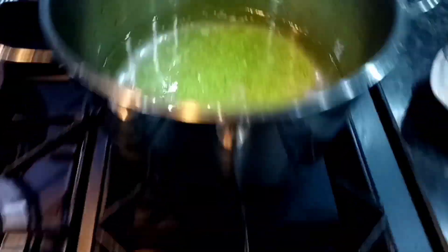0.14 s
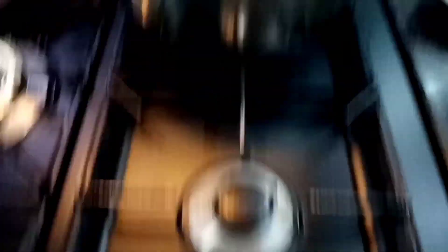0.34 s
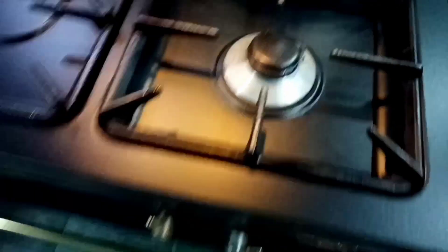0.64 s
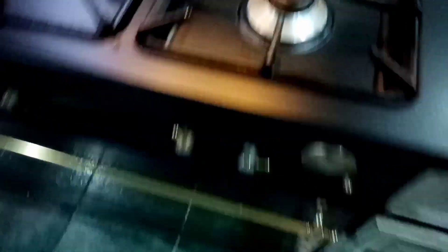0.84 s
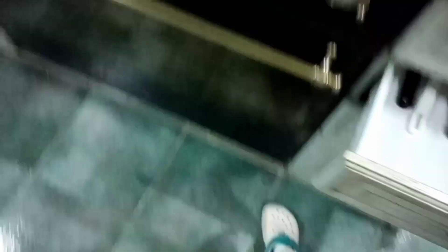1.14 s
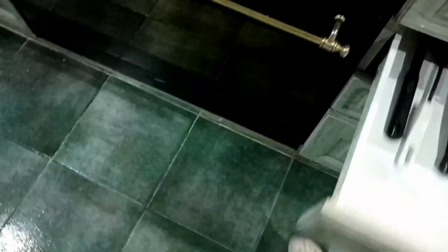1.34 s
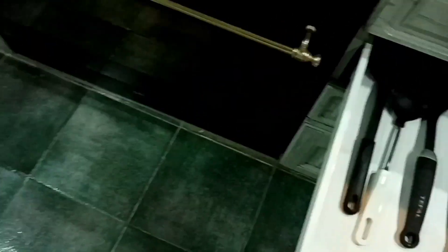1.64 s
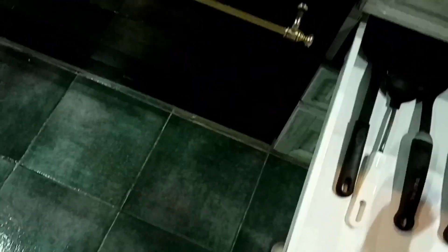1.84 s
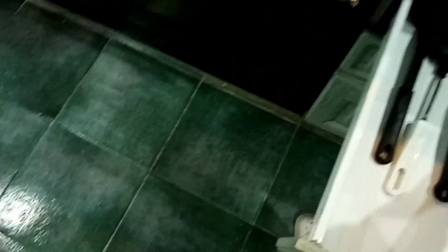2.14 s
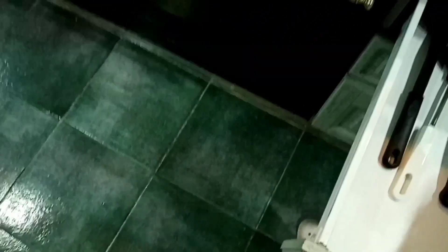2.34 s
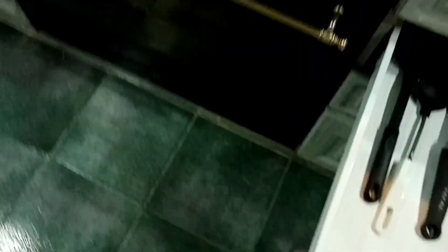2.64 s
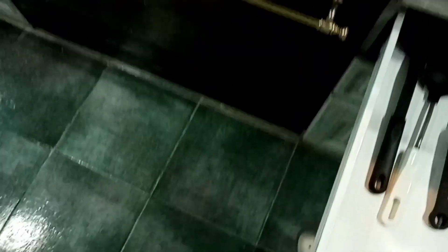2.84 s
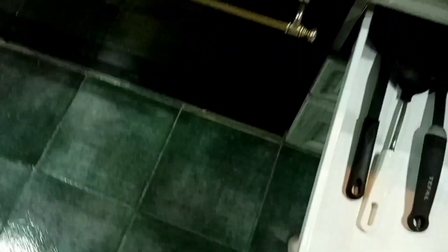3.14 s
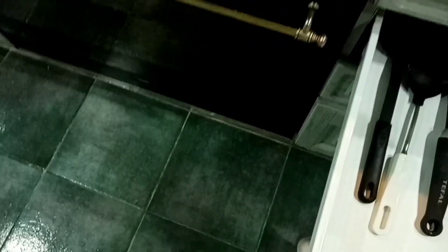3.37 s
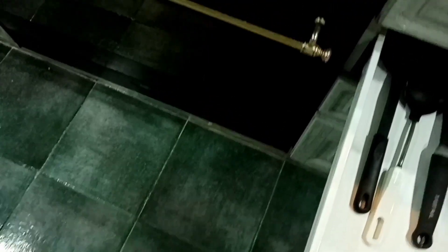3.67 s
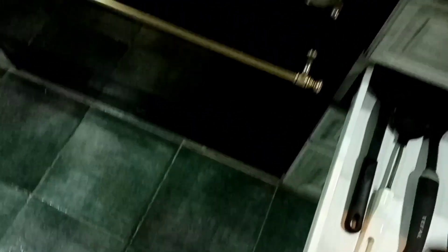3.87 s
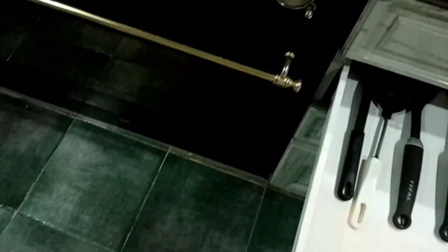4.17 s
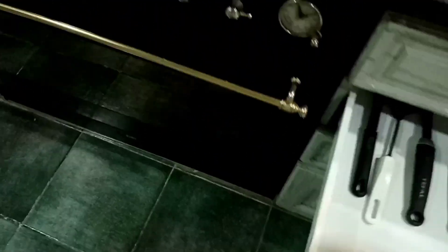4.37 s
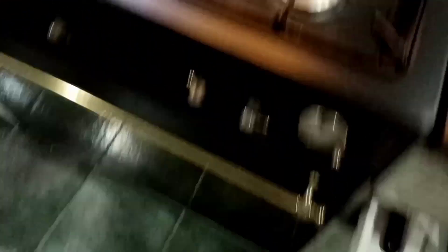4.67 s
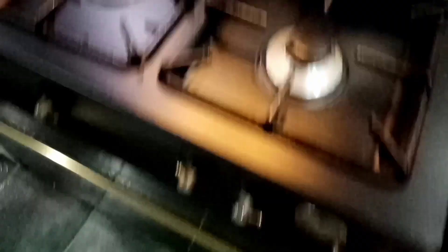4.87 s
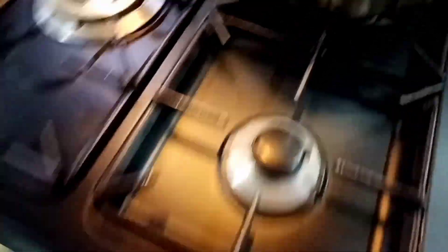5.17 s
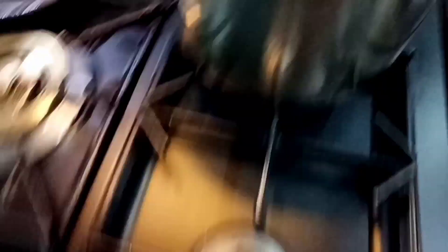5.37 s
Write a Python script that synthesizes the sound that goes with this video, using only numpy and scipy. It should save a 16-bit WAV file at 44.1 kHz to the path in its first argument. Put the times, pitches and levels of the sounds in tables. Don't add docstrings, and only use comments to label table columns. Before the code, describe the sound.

Over faint fridge hum and burner hiss, a drawer of utensils rolls open with rattles, pauses, gets stirred, then rolls shut with a hard clatter.

```python
import sys
import numpy as np
from scipy import signal
from scipy.fft import rfft, irfft, next_fast_len
from scipy.io import wavfile
from scipy.ndimage import uniform_filter1d

SR = 44100
rng = np.random.default_rng(int(sys.argv[2]) if len(sys.argv) > 2 else 0)


def invert_db(x):
    u = np.asarray(x, float) / 20
    return 10 ** u


def pcm_store(signal):
    levels = np.round(np.clip(np.atleast_2d(signal), -1, 1) * 32767)
    wavfile.write(sys.argv[1], SR, levels.astype(np.int16).T)


N = 242991
LONG = next_fast_len(N + 4096)
HZ = np.fft.rfftfreq(LONG, 1 / SR)

# (time [s], level [dB])
HUM_LEVEL = [(0, -44.5), (.5, -46), (3.2, -46), (3.8, -47), (5, -46), (5.51, -44)]
# (multiple of the hum [1], level [dB])
HUM_OVERTONES = [(2, -33), (3, -42), (4, -23.5), (5, -24), (7, -64)]
# (frequency [Hz], level per Hz [dB])
AIR_COLOUR = [(30, 19), (70, -14), (130, -5), (225, 8.5), (280, -1), (480, -2.5), (800, -7.5), (1500, -13),
              (3300, -24), (6000, -22), (10000, -17.5), (12500, -19.5), (16000, -20)]
# (time [s], distance [m])
POT_DISTANCE = [(0, 0.39), (0.35, 0.91), (1.6, 0.59), (2.1, 1.6), (2.8, 0.57), (4.5, 0.92), (5.1, 0.59),
                (5.51, 0.5)]
# (time [s], peak [dB], rise [s])
RUMBLE_SWELLS = [(0.0, -59, 0.015), (0.67, -59, 0.036), (1.1, -52, 0.035), (1.23, -45.5, 0.045),
                 (1.41, -36.5, 0.034), (3.27, -70, .04), (3.61, -66, 0.052), (3.77, -57, .03),
                 (3.93, -53, 0.028), (4.04, -46.5, 0.017), (4.21, -49, 0.14), (4.38, -50, 0.027),
                 (4.6, -51, 0.14), (5.225, -42.5, .025), (5.362, -54, 0.061)]
# (frequency [Hz], t60 [s])
ROOM_T60 = [(100, 0.52), (700, 0.74), (2500, 0.4), (7000, 0.25), (15000, 0.41)]
# (frequency [Hz], level [dB])
ROOM_COLOUR = [(100, -8), (300, -11), (800, 1), (2000, -1.5), (6000, -2), (15000, -15)]

# (frequency [Hz], level [dB], t60 [s])
CABINET = [(113, -35, 0.039), (151, -2, 0.22), (170.4, 1, 0.14), (209.3, -3, 0.18), (228, -6, 0.057),
           (275.5, 1.5, 0.09), (312.2, 0.5, 0.08), (375, -3, 0.029), (439, 0.5, 0.11)]
# (frequency [Hz], level [dB], t60 [s])
TRAY = [(523, 4.5, 0.088), (620, 13, 0.021), (720, 2, 0.05), (858, 4.5, 0.019), (932, -0.5, 0.029),
        (1020, 1, 0.021), (1141, -2.5, 0.02), (1285, -1, 0.014), (1410, -4, 0.033), (1690, -5.5, 0.045),
        (2056, -4.5, 0.078), (2177, -13, 0.049)]
# (frequency [Hz], level [dB], t60 [s])
UTENSILS = [(2800, -33, 0.0075), (3400, 3, 0.019), (4000, -34, 0.0077), (4990, -2, 0.011), (6650, 4, 0.012),
            (7820, 17, 0.015), (9144, 9, 0.023), (11050, -42, 0.011)]
# (frequency [Hz], level [dB], t60 [s])
SPOON = [(1820, 3.5, 0.079), (2090, -21, 0.053), (3070, -4, 0.04), (3900, 5, 0.043), (5540, 5, 0.063)]
# (low edge [Hz], high edge [Hz], level [dB], t60 [s], likeness at the ports [0-1])
CRACKS = [
    (2545, 13700, 16.5, 0.076, 0.01),
    (330.5, 2480, 17, 0.023, 0.07),
    (114, 490, 17.5, 0.06, 0.97),
]
# (time [s], free cavity [0-1])
OPENING = [(0.83, 0.66), (0.96, 0), (1.36, 0.93), (3.9, 0.49), (4.1, 0.65), (4.53, 0.55), (4.58, 0.63),
           (5.04, 0.3), (5.2, 0.98)]

# (time [s], peak [dB], frequency [Hz], t60 [s])
RINGS = [(0.650, -36, 1148, 0.048), (0.651, -39, 1557, .09), (0.66, -48, 1330, .2), (0.665, -52, 724, 0.18),
         (0.70, -52, 1400, 0.091), (0.915, -36, 513, .12), (0.93, -38, 2040, .1), (0.96, -33, 793, .08),
         (0.962, -34, 533, .15), (.985, -35, 590, .1), (1.0, -31, 530, 0.18), (1.005, -41, 1570, 0.073),
         (1.022, -33, 513, .12), (1.045, -36, 301, .09), (1.11, -33, 311, .1), (1.06, -41, 807, .08),
         (1.138, -40, 1277, 0.08), (1.352, -35, 6700, 0.025), (1.376, -34, 6810, 0.04),
         (1.385, -46, 6350, .15), (1.39, -44, 7000, 0.14), (3.256, -40, 230, 0.41), (3.558, -35, 700, 0.15),
         (3.54, -35, 505, .05), (3.541, -34.5, 1690, .06), (3.541, -35.5, 2060, .07),
         (5.200, -37.5, 1180, 0.049), (5.203, -36, 1744, .06), (5.208, -40, 1310, 0.05),
         (5.209, -38, 1587, 0.046), (5.209, -30, 436, 0.081), (5.225, -41, 1580, .06),
         (5.23, -39.5, 648, .2), (0.84, -40.5, 500, 0.17), (1.15, -42, 1216, 0.25), (1.29, -36, 507, .06),
         (1.41, -39, 506, .25), (2.895, -44.5, 1950, .12), (3.411, -41, 1820, .07),
         (3.417, -43, 3090, 0.05), (3.42, -45, 474, 0.16), (3.445, -46, 570, .1), (3.61, -37.5, 720, 0.16),
         (3.61, -51, 960, 0.17), (4.137, -49, 1046, .06), (4.247, -38, 2020, 0.034), (4.255, -36, 546, .08),
         (4.595, -42, 1367, 0.13), (4.59, -29.5, 420, .08), (5.201, -36, 610, .06), (5.204, -37, 1960, .06),
         (5.222, -41, 1745, .06), (5.215, -44, 2420, .08),
         (3.523, -30, 190, .04), (3.5395, -21, 230, .03), (3.5455, -24, 330, .03), (3.543, -30, 1550, .02),
         (3.64, -38, 800, .06), (4.5875, -23, 330, .025), (4.5975, -17.5, 175, .04), (4.610, -21, 220, .04),
         (4.632, -23, 240, .05), (4.66, -29, 330, .05), (4.678, -28, 190, .05), (4.753, -30, 310, .05),
         (4.176, -32, 120, .05), (4.221, -29, 170, .03), (4.268, -31, 350, .04), (4.395, -30, 160, .03),
         (4.468, -31, 300, .06), (1.387, -26, 170, .04), (1.403, -24, 190, .04), (.909, -32, 300, .1),
         (.965, -34, 800, .05), (1.008, -36, 1570, .03), (1.012, -32, 330, .05), (3.541, -27, 400, .04),
         (4.59, -27, 380, .05), (4.612, -29, 360, .05), (4.42, -33, 330, .05), (5.203, -32, 1800, .03),
         (5.211, -32, 1550, .04), (5.206, -45, 5900, .03), (3.2565, -50, 3650, .012),
         (3.2565, -54, 5400, .01), (3.2565, -40, 600, .012), (3.417, -50, 5800, .03),
         (3.429, -44, 6500, .015), (3.442, -48, 4900, .015), (1.3755, -22, 6500, .02),
         (1.351, -32, 9000, .015), (1.30, -39, 8900, .03), (4.247, -27, 9000, .025),
         (4.248, -36, 7000, .02)]
# (start [s], length [s], utensils [dB], tray [dB], cabinet [dB])
STROKES = [(0.81, 0.05, -62, -51, -48), (0.85, 0.05, -53, -48, -46), (0.905, 0.09, -44, -41, -35),
           (1.0, 0.05, -48, -39, -36), (1.05, 0.06, -45, -41, -36), (1.11, 0.24, -44, -41, -33.5),
           (2.74, 0.05, -61, -62, -74), (2.79, 0.08, -56.5, -62, -68), (3.25, 0.18, -55.5, -59, -60),
           (3.42, 0.052, -64, -67, -48.5), (3.5, 0.02, -49, -50, -50), (3.9, 0.11, -70, -86, -45),
           (4.03, 0.2, -61, -59.5, -42.5), (4.33, 0.39, -52, -51.5, -35), (4.555, 0.036, -35, -40.5, -42),
           (5.1, 0.2, -57.5, -53, -50)]
# (start [s], length [s], utensils [dB], tray [dB], cabinet [dB])
SETTLES = [
    (1.385, 0.2, -43, -50, -39),
    (2.86, 0.053, -46, -55, -70),
    (2.95, 0.06, -47, -57.5, -52),
    (3.58, 0.22, -53, -52.5, -56),
    (4.18, 0.29, -44, -44.5, -33),
    (4.61, 0.2, -41.5, -42, -29.5),
    (4.82, 0.28, -54.5, -45.5, -37),
    (5.25, 0.47, -57, -56, -48),
]
# (time [s], utensils peak [dB], tray peak [dB], cabinet peak [dB], loudest frequency [Hz])
KNOCKS = [(0.6507, -34, -28, -38, 1200), (0.666, -46, -38.5, -38.5, 1330), (0.9115, -45, -38, -50, 533),
          (1.3978, -42, -34, -31.5, 1630), (3.256, -44, -47, -43, 620), (3.524, -37, -33, -35, 1290),
          (3.5321, -29, -31, -35, 740), (3.5396, -22, -23.5, -32, 770), (3.5449, -30, -38, -51, 1240),
          (4.0386, -63, -74, -46.5, 452), (4.089, -57, -48, -46, 485), (4.1388, -42.5, -41.5, -62, 1040),
          (4.213, -31, -34, -38, 537), (4.468, -47, -41, -37.5, 487), (4.5877, -18.5, -26.5, -28, 466),
          (4.6016, -22.5, -31, -30, 424), (4.632, -43, -47, -33, 456), (5.1995, -40, -31, -35.5, 1110),
          (5.2143, -49, -30, -35, 424), (5.2194, -38, -32, -43, 1750), (5.278, -52, -40.5, -41.5, 1110)]
# (time [s], utensils peak [dB], drawer peak [dB], loudest frequency [Hz])
CLICKS = [(1.3512, -20.5, -50, 6740), (1.3758, -13.5, -37, 6340), (2.9128, -34, -59, 5140),
          (2.9482, -37, -47, 5950), (3.4152, -38, -47.5, 5760), (3.4286, -36.5, -46, 3100),
          (4.1794, -32, -46, 4300), (4.2445, -25, -32, 6900), (4.2485, -18, -31, 8600),
          (4.225, -37, -44, 6500), (4.382, -31.5, -51, 2790), (4.611, -25, -46, 5400)]
# (time [s], utensils peak [dB], drawer peak [dB], loudest frequency [Hz])
SLIPS = [(0.8711, -38.5, -43, 6170), (0.9274, -35, -37.5, 2660), (0.957, -24, -32, 6900),
         (1.059, -27.5, -38, 6650), (1.0977, -31, -34.5, 2800), (1.1353, -30, -34.5, 6470),
         (1.1976, -50, -34, 2830), (1.2382, -30, -35, 7050), (1.2782, -31, -43, 5540),
         (1.2989, -27, -37, 5500), (2.7594, -60, -52.5, 2790), (2.8654, -40, -52, 5150),
         (2.8894, -39, -58, 4990), (2.9787, -38, -64, 5930), (2.9992, -40.5, -71, 4600),
         (3.3302, -46, -69, 3700), (3.345, -41, -58, 5000), (3.459, -56, -47, 3840),
         (4.4151, -37, -52, 5200), (4.4929, -39, -52, 5400), (4.6896, -37, -45, 4760),
         (4.7294, -35, -42, 5900), (4.7596, -39, -42, 3460), (4.7989, -38, -42.5, 2770)]
# (time [s], peak [dB])
SPOON_TAPS = [
    (2.866, -41),
    (2.893, -54),
    (2.915, -40),
    (3.412, -39),
    (3.421, -35),
    (3.431, -49),
]
# (time [s], peak [dB], loudest frequency [Hz])
THUMPS = [
    (1.392, -34, 162),
    (3.524, -33, 179),
    (4.178, -40, 165),
    (4.596, -27, 148),
    (4.661, -49, 137),
    (4.721, -33, 135),
    (5.211, -28.5, 148),
]
# (time [s], peak above 11.5 kHz [dB])
SNAPS = [(0.9492, -28), (1.059, -33.5), (1.097, -45), (1.3764, -25), (4.198, -35), (4.211, -26),
         (4.245, -19), (4.548, -40), (4.563, -39), (4.576, -26), (4.588, -16), (4.6094, -26), (4.6294, -34),
         (4.65, -43), (4.675, -36), (4.705, -48), (4.765, -40), (.97, -36), (1.08, -33), (1.11, -40)]

# (frequency [Hz], level [dB])
RIGHT_PORT = [(30, -32), (100, 0.5), (2500, 2), (3500, 0.5), (4300, 1.5), (5400, 2.5), (6500, 7.5),
              (8000, -4.5), (9200, 4), (11000, -5), (13500, -11), (14900, 0), (15400, -1)]
# (frequency [Hz], level [dB])
LEFT_MUFFLE = [(60, 3), (110, -1.5), (180, -4.5), (700, -2), (1300, -1), (4500, -2.5), (7500, -3.5),
               (9500, -13.5), (11000, -68), (15000, -67)]
# (frequency [Hz], level [dB])
TREBLE_END = [(15500, 0), (15650, -32), (16000, -44), (16600, -48), (16700, -90)]

HUM_HZ, HUM_WANDER_DB = 100.6, 0.5
AIR_DB, AIR_DB_PER_M, AIR_WANDER_DB, SIMMER_DB = -53.5, -1.5, 0.5, -74.5
SWELL_FALL_PER_RISE, RUMBLE_REST_DB = 0.98, -66.5
BOOM_SHUT_HZ, BOOM_OPEN_HZ = 296.6, 205.4
RING_RISE_S, RING_BEAT = 0.0016, 0.0137
KNOCK_CONTACT_S, CLICK_CONTACT_S, SLIP_CONTACT_S = 0.0036, 0.0032, 0.0099
CONTACT_RISE_S, SLIP_FIRST_HIT, BLOW_SPREAD_DB = 0.0022, 0.6, 2.8
CABINET_UNDER_TRAY_DB = -5.5
KNOCK_TOP_HZ, KNOCK_DB_PER_OCTAVE, CLICK_LOW_SHARE = 6500, 7.0, 0.6
SNAP_T60_S, SNAP_TOP_HZ = 0.055, 19400
STROKE_ATTACK_S, STROKE_RELEASE_S = 0.014, 0.026
SETTLE_FADE_DB_S = (33, 28.5, 49)
AFTERSHAKE_DB, AFTERSHAKE_FADE_DB_S = (-17.5, -17, -14), (346, 230, 252)
TREMBLE_RISE_S = 0.02
ROLL_FOCUS_HZ = (520, 760, 1467)
GUST_DB = 3.5
RIGHT_LAG_S = 0.000703


def on_log(points, hz):
    f, value = np.transpose(points)
    return np.interp(np.log(hz + 1e-9), np.log(f), value)


def over_time(points, s):
    return np.interp(s, *np.transpose(points))


def unit(x):
    return x / np.sqrt(np.mean(x ** 2))


def band(x, lo_hz, hi_hz):
    edges = [lo_hz, min(hi_hz, 0.45 * SR)]
    return signal.sosfilt(signal.butter(2, edges, "bandpass", fs=SR, output="sos"), x)


def walk(rate):
    k = int(SR / rate)
    held = rng.standard_normal(N // 100)[np.arange(N) // k]
    return uniform_filter1d(uniform_filter1d(held, k), k)


def port_noise(count, alike):
    shared, *own = rng.standard_normal((3, count))
    return np.sqrt(alike) * shared + np.sqrt(1 - alike) * np.array(own)


def contacts(count, share, scatter_db):
    u = rng.random((3, count))
    return (u[0] < share) * np.sign(u[1] - 0.5) * invert_db(-scatter_db * np.log(1 - u[2]))


def add(out, s, sound, peak_db):
    at = int(s * SR)
    out[:, at:at + sound.shape[1]] += sound * invert_db(peak_db) / np.abs(sound).max()


def hum():
    t = np.arange(N) / SR
    phase = 2 * np.pi * HUM_HZ * t
    overtones = sum(invert_db(db + 1.1 * walk(11.0)) * np.sin(k * phase + k) for k, db in HUM_OVERTONES)
    level = over_time(HUM_LEVEL, t) + HUM_WANDER_DB * walk(14)
    return np.sqrt(2) * invert_db(level) * (np.sin(phase) + overtones)


def air():
    alike = 1 / (1 + (HZ / 430) ** 4)
    shared, *own = rfft(rng.standard_normal((3, LONG)))
    spectrum = np.sqrt(alike) * shared + np.sqrt(1 - alike) * np.array(own)
    noise = irfft(invert_db(on_log(AIR_COLOUR, HZ)) * spectrum, LONG)[:, :N]
    distance_m = over_time(POT_DISTANCE, np.arange(N) / SR)
    level = AIR_DB + AIR_DB_PER_M * distance_m + AIR_WANDER_DB * walk(3.38)
    return noise / np.sqrt(np.mean(band(noise, 190, 3000) ** 2)) * invert_db(level)


def simmer():
    fizz = band(rng.standard_normal((2, N)) + 0.35 * contacts(N, 0.012, 1.5), 1520, 5800)
    distance_m = over_time(POT_DISTANCE, np.arange(N) / SR)
    return unit(fizz) * invert_db(SIMMER_DB + 0.97 * walk(1.8)) / distance_m ** 2


def low_rumble():
    t = np.arange(N) / SR
    give = np.full(N, invert_db(RUMBLE_REST_DB))
    for s, db, rise in RUMBLE_SWELLS:
        width = np.where(t < s, rise, SWELL_FALL_PER_RISE * rise)
        give += invert_db(db) * np.exp(-((t - s) / width) ** 2)
    rumble = rng.standard_normal(N) + 0.73 * rng.standard_normal((2, N))
    return unit(band(band(rumble, 26, 121), 27, 129)) * invert_db(7.0) * give


def room(x):
    t = np.arange(int(0.7 * SR)) / SR
    tail = 0
    for hz in 63 * 2.0 ** np.arange(9):
        alike = 1 / (1 + (hz / 600) ** 3)
        noise = band(port_noise(len(t), alike), hz / np.sqrt(2), hz * np.sqrt(2))
        decay_db = on_log(ROOM_COLOUR, hz) - 60 * t / on_log(ROOM_T60, hz)
        tail = tail + noise * invert_db(decay_db) * np.minimum(t / 0.0028, 1)
    return signal.fftconvolve(x, tail / 30, axes=1)[:, :N]


def ring(modes, crack, focus_hz, spread_db):
    lo_hz, hi_hz, crack_db, crack_t60, alike = crack
    if focus_hz:
        modes = [(f, db - 6.1 * abs(np.log2(f / focus_hz)), t60) for f, db, t60 in modes]
        modes = modes + [(focus_hz, 3.0, 12 / focus_hz ** 0.85)]
    hz, db, t60 = np.transpose(modes)[:, :, None]
    t = np.arange(int(40 * SR / lo_hz ** 1.2)) / SR
    chance = rng.standard_normal((3, len(modes), 1))
    strength = invert_db(db + spread_db * chance[0] - 60 * t / t60) * np.sign(chance[1])
    tones = strength * np.sin(2 * np.pi * hz * (1 + 0.02 * chance[2]) * t)
    noise = port_noise(len(t), alike)
    noise[:, 0] = 5.0
    return tones.sum(0) + band(noise * invert_db(crack_db - 60 * t / crack_t60), lo_hz, hi_hz)


def bodies(focus_hz, boom_hz, spread_db):
    foci = (focus_hz * (focus_hz > 2500), focus_hz * (focus_hz <= 2500), boom_hz)
    return [ring(*part, spread_db) for part in zip((UTENSILS, TRAY, CABINET), CRACKS, foci)]


def boom_at(s):
    return BOOM_SHUT_HZ + (BOOM_OPEN_HZ - BOOM_SHUT_HZ) * over_time(OPENING, s)


def all_blows():
    rows = [(*row, KNOCK_CONTACT_S) for row in KNOCKS]
    for light, contact_s in ((CLICKS, CLICK_CONTACT_S), (SLIPS, SLIP_CONTACT_S)):
        for s, db, low_db, hz in light:
            rows.append((s, db, low_db, low_db + CABINET_UNDER_TRAY_DB, hz, contact_s))
    return rows


def efforts():
    t = np.arange(N) / SR
    power, jolts = np.full((3, N), 1e-12), np.zeros((3, N))
    for rows, fade_db_s in ((STROKES, (0, 0, 0)), (SETTLES, SETTLE_FADE_DB_S)):
        fade = np.array(fade_db_s)[:, None]
        for s, length, *levels_db in rows:
            attack = np.clip((t - s) / STROKE_ATTACK_S, 0, 1)
            release = np.exp(-np.maximum(t - s - length, 0) / STROKE_RELEASE_S)
            level = invert_db(np.array(levels_db)[:, None] - fade * np.clip(t - s, 0, length))
            power += (level * attack * release) ** 2
    for s, *peaks_db, hz, contact_s in all_blows():
        jolts[:, int(s * SR)] += invert_db(np.add(peaks_db, AFTERSHAKE_DB)) ** 2
    trembling = [signal.lfilter([1], [1, -invert_db(-2 * fade / SR)], row)
                 for row, fade in zip(jolts, AFTERSHAKE_FADE_DB_S)]
    swelling = uniform_filter1d(trembling, int(TREMBLE_RISE_S * SR) + 1, axis=1)
    return 10 * np.log10(power + np.abs(swelling))


def rings():
    out, t = np.zeros((2, N + SR)), np.arange(SR // 3) / SR
    for s, db, hz, t60 in RINGS:
        pair = np.sin(2 * np.pi * hz * t) + 0.23 * np.sin(2 * np.pi * hz * (1 + RING_BEAT) * t)
        envelope = invert_db(-60 * t / t60) * (1 - np.exp(-t / RING_RISE_S))
        add(out, s, (pair * envelope)[None], db)
    return out[:, :N]


def cavity_boom(effort_db):
    boom, boom_hz = np.zeros(N), boom_at(np.arange(N) / SR)
    bumps = unit(contacts(N, 0.01, 1.4)) * invert_db(effort_db - 1.5)
    near = np.array([invert_db(-16.0 * np.abs(np.log2(hz / boom_hz))) for hz, db, t60 in CABINET])
    near = near / np.sqrt(np.sum(near ** 2, axis=0))
    for (hz, db, t60), weight in zip(CABINET, near):
        pole = np.exp(2j * np.pi * hz / SR - np.log(1000) / (1.13 * t60 * SR))
        push = np.sqrt(2 - 2 * abs(pole) ** 2) * invert_db(db) * rng.choice([-1, 1])
        boom += signal.lfilter([push], [1, -pole], bumps * weight).imag
    return band(boom, 95, 520)


def moves():
    out, efforts_db, gust = np.zeros((2, N)), efforts(), walk(60)
    for focus_hz in ROLL_FOCUS_HZ:
        for response, share, db in zip(bodies(focus_hz, 0, 3.8), (0.05, 0.03), efforts_db):
            ticks = contacts(N, share, 1.6) * invert_db(GUST_DB * gust + 1.8 * walk(27))
            size = np.sqrt(np.mean(ticks ** 2) * np.sum(response[0] ** 2))
            drive = (ticks * invert_db(db - 6.0))[None]
            out += signal.oaconvolve(drive, response, axes=1)[:, :N] / size
    return out + cavity_boom(efforts_db[2])


def spoon_thumps_and_snaps(out):
    for s, db in SPOON_TAPS:
        add(out, s, ring(SPOON, (1700, 9000, -8, 4.0, 1.0), 0, 1.7), db)
    for s, db, hz in THUMPS:
        add(out, s, ring(CABINET[:4], (150, 450, 3.4, 0.042, 0.36), hz, 1.1), db)
    t = np.arange(SR // 25) / SR
    envelope = invert_db(-60 * t / SNAP_T60_S) * np.minimum(t / 0.0028, 1)
    for s, db in SNAPS:
        snap = band(rng.standard_normal((2, len(t))) * envelope, 10800, SNAP_TOP_HZ)
        add(out, s, band(snap, 11800, SNAP_TOP_HZ), db + 6.5)


def blows():
    out = np.zeros((2, N + SR))
    t = np.arange(SR // 25) / SR
    for s, *peaks_db, focus_hz, contact_s in all_blows():
        flurry = np.exp(-t / contact_s) * (1 - np.exp(-t / CONTACT_RISE_S))
        force = contacts(len(t), 0.05, 2.27) * flurry
        first_hit = SLIP_FIRST_HIT if contact_s == SLIP_CONTACT_S else 1
        force[0] = 2.73 * (0.0029 / contact_s) ** 2 * first_hit
        bright, *wood = bodies(focus_hz, boom_at(s + 0.026), BLOW_SPREAD_DB)
        if focus_hz > 2500:
            bright = band(bright, CLICK_LOW_SHARE * focus_hz, SR)
        else:
            top_hz = KNOCK_TOP_HZ * 2 ** ((peaks_db[0] + 30) / KNOCK_DB_PER_OCTAVE)
            bright = band(bright, 1500, max(top_hz, 5000))
        for response, db, trim_db in zip((bright, *wood), peaks_db, (3.0, 7.0, 7.0)):
            add(out, s, signal.fftconvolve(force[None], response, axes=1), db + trim_db)
    spoon_thumps_and_snaps(out)
    return out[:, :N]


def scene():
    drawer = blows() + moves() + rings()
    background = hum() + air() + low_rumble() + simmer()
    return invert_db(-0.5) * drawer + invert_db(-4.5) * room(drawer) + background


def roll_off(x):
    return signal.sosfilt(signal.butter(12, 16650, fs=SR, output="sos"), x)


def record(dry):
    bright = invert_db(on_log(RIGHT_PORT, HZ) + on_log(TREBLE_END, HZ))
    left = bright * invert_db(on_log(LEFT_MUFFLE, HZ))
    right = bright * np.exp(-2j * np.pi * HZ * RIGHT_LAG_S - 0.15j)
    mix = irfft(rfft(dry, LONG) * np.array([left, right]), LONG)[:, :N]
    return roll_off(mix)


dry = scene()
out = record(dry)
pcm_store(out)
```